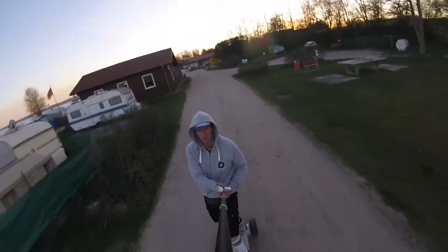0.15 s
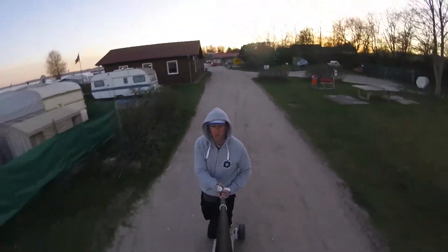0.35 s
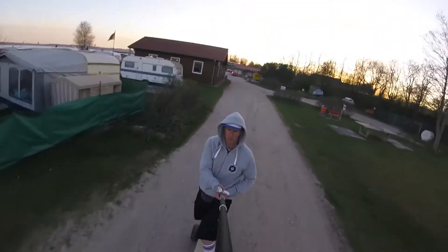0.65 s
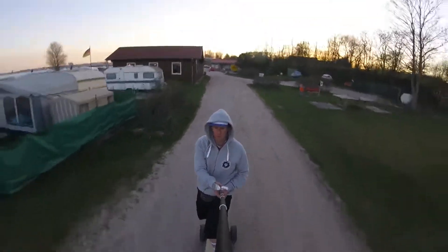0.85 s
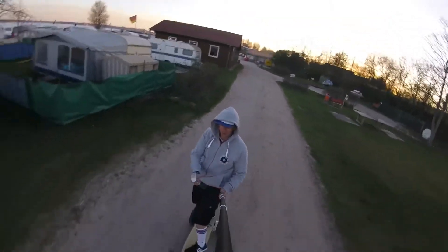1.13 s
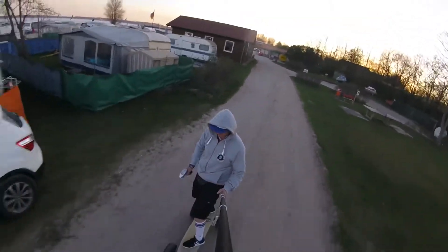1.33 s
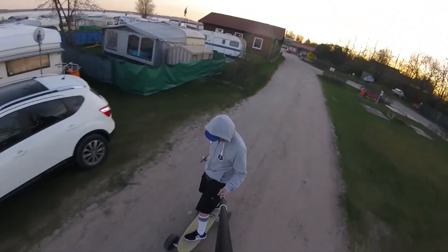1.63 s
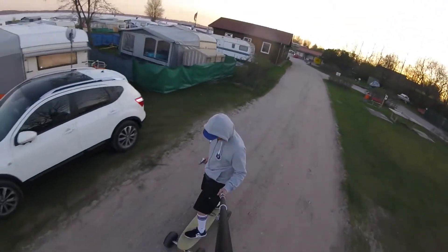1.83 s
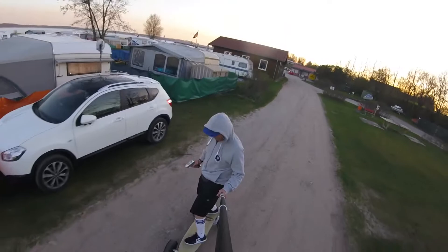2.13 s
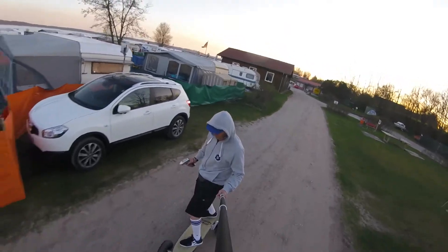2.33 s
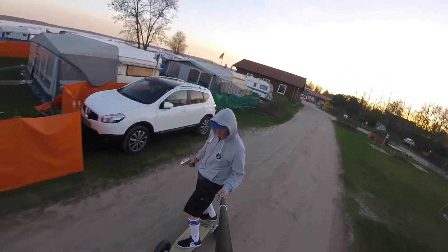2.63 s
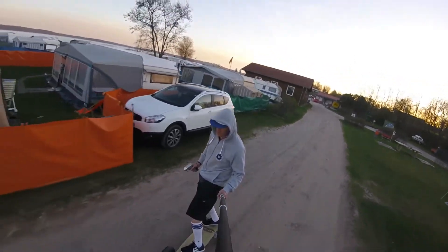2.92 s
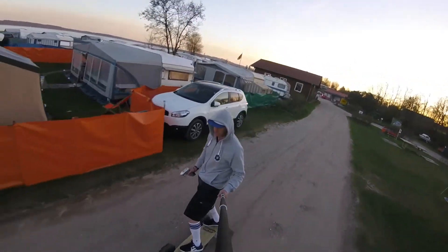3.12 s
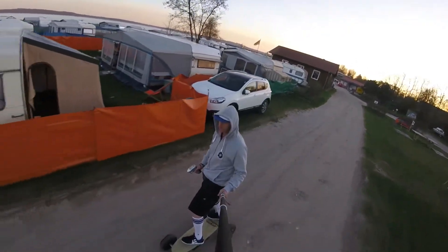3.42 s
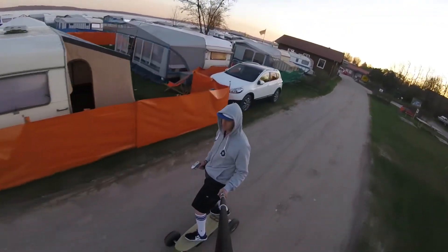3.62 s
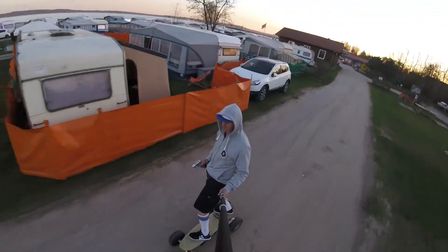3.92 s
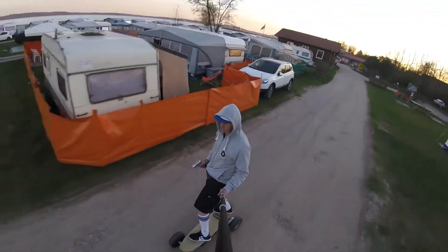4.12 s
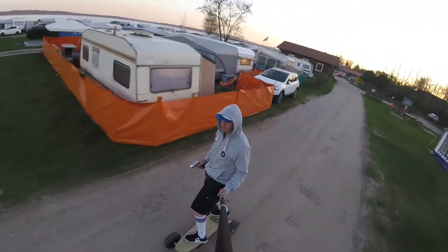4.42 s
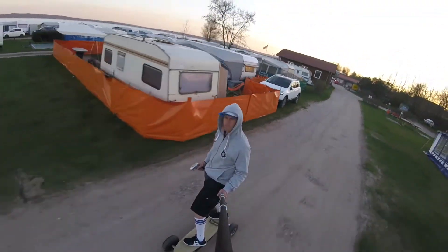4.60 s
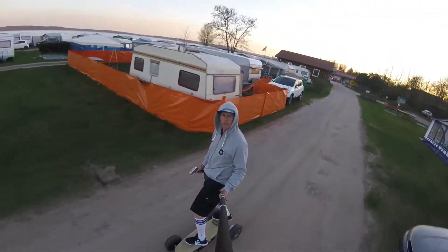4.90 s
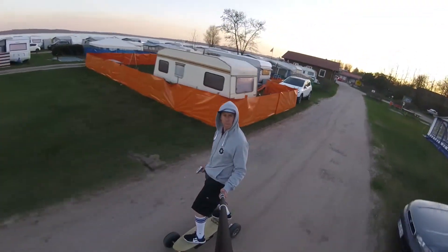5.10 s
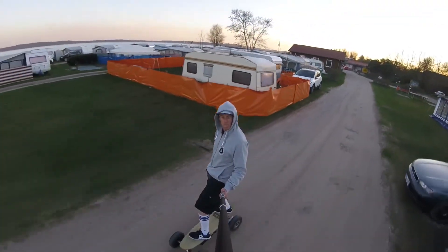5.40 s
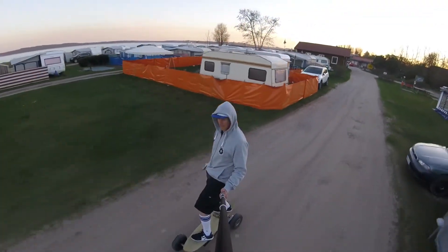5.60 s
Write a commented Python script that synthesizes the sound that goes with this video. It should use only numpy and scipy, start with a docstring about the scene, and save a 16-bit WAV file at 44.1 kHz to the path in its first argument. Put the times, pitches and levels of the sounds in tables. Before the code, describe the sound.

An electric board rolls along a gravel path in the open, heard from a small microphone exposed to moving air. Throughout, the tyres make a dry, grainy crunch with fine fizz, peppered by tiny clicks and sharper stone snaps. From 0 to 2 s, low wind flutters and thumps, with a deep thud near 0.8 s and rough gusts around 1.5 to 1.6 s; a hard snap falls at 1.55 s. Small woody knocks on the board come at 0.4, 0.9 and 1.1 s. Between about 2.3 and 3.8 s the wind mostly eases, exposing crackling stones, with strong snaps near 2.6, 2.9 and 3.15 s. After 2 s a faint motor hum enters and mostly climbs, beneath a thin, high, steady whistle. Wind returns around 4 s; loud snaps hit at 4.3, 4.7, 4.9 and 5.3 s, with buffeting and crunch continuing to the end.

```python
"""Electric board on gravel

An electric mountainboard rolls along a gravel path: filtered noise grains make the tyres' crunch,
and short decaying tones make the snapping stones and the knocks on the board.
Shaped noise and slow pulses make the wind buffeting the microphone.
After about two seconds the rider opens the throttle: sine tones make the controller's whistle
and the motor hum, which mostly climbs."""
import sys
import numpy as np
from scipy import signal
from scipy.fft import rfft, irfft, next_fast_len
from scipy.io import wavfile
from scipy.ndimage import uniform_filter1d

SR = 44100
rng = np.random.default_rng(int(sys.argv[2]) if len(sys.argv) > 2 else 0)


def wav_record(signal):
    """Record a signal, one row per channel, as 16-bit PCM in the file named by sys.argv[1]."""
    frames = np.transpose(np.atleast_2d(signal))
    bounded = np.clip(frames, -1, 1)
    # unit amplitude maps onto the largest positive 16-bit level
    quanta = np.round(bounded * 32767).astype(np.int16)
    wavfile.write(sys.argv[1], SR, quanta)


N = 253575
TIME = np.arange(N) / SR  # seconds

# All table levels are relative: the functions add trims to them.
# Air streaming past the microphone: t/s, buffeting level/dB, flutter level/dB
WIND_CURVE = [(0.0, -26.5, -31.5), (0.5, -20.5, -27.5), (0.95, -22, -31), (1.4, -27.5, -34.5),
              (1.75, -31, -37), (2.05, -24.5, -33), (2.55, -36, -45.5), (2.9, -32.5, -35),
              (3.35, -36, -35.5), (4.0, -23, -31.5), (4.45, -21, -31), (4.62, -23.5, -27),
              (5.35, -25.5, -32), (5.6, -20, -25), (5.75, -19.5, -27.5)]
# Gusts on top of the stream: middle t/s, length t/s, buffeting lift/dB, flutter lift/dB
GUSTS = [(0.337, 0.058, 9, 0), (0.496, 0.084, 3, 8), (0.65, 0.035, 5, -7), (0.73, 0.14, -6, 1),
         (0.917, 0.11, 5.5, 1.5), (1.232, 0.095, 5, -1), (1.337, 0.1, 2.5, 7.5), (1.531, 0.038, 14, 2),
         (1.624, 0.14, 8.5, 11), (1.843, 0.079, 10, 6.5), (1.96, 0.12, 5, 7.5), (2.12, 0.078, 3.5, 5.5),
         (3.456, 0.069, 6, 1), (3.679, 0.13, 6, -1), (3.807, 0.055, 4, 1), (4.177, 0.057, 7, 4),
         (4.372, 0.052, 4, 7.5), (4.444, 0.11, 1.5, 9.5), (4.514, 0.11, 4, 8), (5.001, 0.054, 2.5, 2),
         (5.136, 0.096, 5.5, 1.5), (5.55, 0.067, 0.5, 4), (5.625, 0.061, 1, 4)]
# Lulls in which the air lets go: middle t/s, length t/s, level drop/dB
LULLS = [(.29, 0.039, 3), (.40, 0.13, 4), (.55, .04, 4), (.622, 0.031, 5), (.752, .02, 4), (.845, 0.12, 6),
         (1.01, 0.035, 5), (1.42, 0.048, 9), (1.575, .035, 5), (1.76, 0.2, 1), (3.39, 0.086, 8),
         (4.04, 0.046, 5), (4.23, 0.1, 4), (4.57, 0.15, 5), (5.535, 0.032, 4), (5.597, 0.039, 5),
         (5.675, 0.088, 6)]
# Spectrum of the large eddies: f/Hz, density level/dB
BUFFET_SPECTRUM = [(12, -10), (25, -10), (40, 1.5), (62, 0.5), (100, -3), (140, -16.5), (200, -29.5),
                   (400, -42.5), (1000, -80)]
# Spectrum of the smaller, faster eddies: f/Hz, density level/dB
FLUTTER_SPECTRUM = [(70, -50), (120, 8.5), (160, 2), (220, -2.5), (320, -16), (500, -22.5), (900, -28),
                    (3000, -74)]
# Spectrum of the fine turbulence in strong gusts: f/Hz, density level/dB
TEARING_SPECTRUM = [(120, -12), (230, 3), (330, 3.5), (500, -11.5), (750, -14.5), (1500, -34)]
# Single eddies thudding on the microphone: t/s, peak level/dB, pitch f/Hz
THUDS = [(0.330, -15.5, 110), (0.350, -16, 70), (0.445, -17, 120), (.497, -15.5, 180), (.507, -12, 120),
         (0.576, -12, 83), (0.645, -12, 121), (0.665, -10, 85), (.703, -13.5, 150), (.718, -9.5, 100),
         (0.727, -15, 162), (0.765, -4.5, 58.5), (4.168, -15, 98.8), (4.197, -12, 130), (4.359, -10, 128),
         (4.390, -14.5, 115), (4.452, -14.5, 95), (4.487, -16, 105), (5.511, -10.5, 114), (5.555, -14, 170),
         (5.562, -15.5, 190), (5.621, -7.5, 95.2), (5.634, -9, 90), (5.716, -14, 130)]
# Short ragged buffets: middle t/s, length t/s, level/dB, top of the band f/Hz
TEARS = [(0.325, .025, -28, 378), (0.455, 0.044, -30, 450), (.497, .04, -31, 477), (.642, 0.016, -26, 355),
         (.715, .09, -23, 190), (1.64, 0.045, -31, 238), (4.111, 0.02, -27, 400), (4.164, 0.039, -29, 480),
         (4.289, .025, -35, 486), (4.36, .035, -29, 278), (4.386, 0.023, -42.5, 541),
         (4.438, 0.036, -31, 496), (4.499, 0.0182, -27, 500), (4.525, 0.028, -27, 440),
         (4.695, .025, -34, 477), (4.997, 0.031, -28, 380), (5.556, 0.044, -27, 420),
         (5.616, 0.03, -29.5, 520), (5.71, 0.044, -28, 278)]
# Motor and controller: t/s, hum f/Hz, hum level/dB, whistle level/dB
MOTOR_CURVE = [(1.9, 322, -90, -100), (2.2, 336, -69, -58), (2.5, 337, -66, -62), (3.05, 338.7, -51.5, -59),
               (3.4, 365.3, -49.5, -71), (3.8, 376.8, -47.5, -63), (4.12, 387, -48.5, -66),
               (4.32, 404, -44.5, -69), (4.65, 413, -50, -69), (4.9, 429.7, -50, -64),
               (5.4, 428.3, -46, -57.5), (5.75, 437.5, -53, -63)]
# Partials of the motor hum: multiple of the hum f, level/dB
HUM_PARTIALS = [(1, -3), (2, -15), (3, -10)]
# Stones knocking on the board: t/s, peak level/dB, ring f/Hz, 60 dB decay t/s, rattle level/dB
KNOCKS = [(0.0777, -33, 1023, 0.085, -8), (.4115, -22, 1003, 0.058, -15), (0.412, -28, 1330, 0.035, -11),
          (.4125, -31, 660, 0.031, -10), (0.8638, -29, 1680, 0.016, -5), (0.8728, -25.5, 1670, 0.025, -4),
          (1.134, -23.5, 1130, 0.011, -10), (2.121, -32, 1445, 0.063, 1), (3.159, -36, 994, .015, -4),
          (4.609, -27, 700, 0.037, -12), (5.325, -23, 1499, .018, -14)]
# Loudest stones snapping from under the tyres:
# t/s, peak level/dB, pitch f/Hz, 60 dB decay t/s, contact hardness level/dB
STONES = [(.0773, -19, 1370, 0.0072, -7), (.1543, -13.5, 2030, 0.0055, -5), (.1612, -23, 1920, .004, -7),
          (.1971, -12.5, 2000, 0.0027, -1), (.2029, -17, 2180, .004, 2), (.3499, -17, 2840, .004, -5),
          (.4235, -21, 2050, .012, -10), (.4792, -19, 4800, .0015, -4), (.5543, -24, 3280, .002, -3),
          (.5584, -28, 3030, .002, -6), (.7755, -14.5, 4460, 0.00055, 5.5), (.865, -15, 1750, 0.0075, -10),
          (.9583, -18.5, 1900, .008, 5), (1.0797, -21, 4070, 0.0012, -3), (1.1819, -21, 3580, .002, -4),
          (1.2274, -16, 1700, 0.0065, -4), (1.3179, -20, 2630, .003, -4), (1.3455, -15.5, 4230, 0.0012, -6),
          (1.3868, -17, 2420, .004, 0), (1.455, -19, 4800, .0015, -4), (1.5535, -7, 1820, 0.0036, -9),
          (1.5555, -13, 2540, .003, -6), (2.1202, -21, 1600, .004, -9), (2.1212, -11, 1600, .0045, 2),
          (2.2934, -20, 3500, .002, -2), (2.3949, -17, 2110, 0.0044, -5), (2.4888, -18, 4750, .0015, -3),
          (2.5153, -15.5, 2340, 0.0033, -6), (2.5217, -20, 3900, 0.0017, 0),
          (2.5758, -8.5, 5300, 0.0011, -14), (2.6585, -23, 4280, .0015, -3), (2.7832, -15, 2900, .0055, -3),
          (2.8229, -15, 4430, .0015, -7), (2.8945, -13, 2100, 0.0066, -9), (2.8955, -12, 2070, 0.0089, -5),
          (2.9032, -15, 1560, .004, -5), (2.9725, -16, 5130, 0.002, -4), (3.0298, -20, 2700, .004, -3),
          (3.0359, -16.5, 2430, .003, -4), (3.097, -13, 1550, 0.0029, -11),
          (3.1585, -6.5, 1657, 0.0035, -11), (3.3733, -14, 2245, 0.0041, -1),
          (3.4237, -17, 2430, 0.0077, -9), (3.4245, -11.5, 2940, 0.01, -7), (3.6773, -17, 2030, 0.0046, -3),
          (3.9016, -15, 2480, 0.0036, 0), (4.2855, -7.5, 2650, 0.005, -9),
          (4.2858, -12.5, 5200, 0.011, -16), (4.2862, -10.5, 3600, 0.005, -10),
          (4.4572, -15.5, 2525, 0.0037, -2), (4.5012, -13, 1680, 0.0032, -8), (4.6083, -20, 1400, .004, 3),
          (4.7064, -19, 3000, .0027, 0), (4.7085, -18, 1800, .007, -10), (4.7176, -10, 2050, 0.0042, 3.5),
          (4.7275, -19, 1870, .01, -12), (4.7244, -16, 2800, .003, -6), (4.7343, -18, 1930, .004, -6),
          (4.9105, -7.5, 1946, 0.0016, -9), (4.9888, -13.5, 2130, 0.0037, -4),
          (5.3213, -12, 1990, .005, -3), (5.3243, -10, 1510, .004, -8), (5.3255, -12, 1690, 0.0043, -7),
          (5.3295, -17, 5490, 0.0036, -3), (5.333, -20, 2600, .002, 2), (5.4153, -13.5, 2900, 0.0071, -6),
          (5.4362, -13.5, 2700, .004, 0), (5.5936, -18, 4600, 0.0013, -3)]
# How hard the tyres work the path: t/s, coarse crunch level/dB, fine fizz level/dB
ROLL_CURVE = [(0.0, -34, -35), (0.55, -35, -35.6), (0.72, -36.5, -37), (0.98, -35, -35), (1.55, -35, -36.5),
              (1.73, -38, -37), (2.35, -36.5, -37), (2.92, -33.5, -34.5), (3.25, -35.5, -35.5),
              (4.08, -35.5, -36.5), (4.36, -33, -33), (4.75, -32.5, -33.5), (5.22, -35, -34.5),
              (5.42, -34, -32.5), (5.75, -34, -33.5)]
# Patches of loose gravel: middle t/s, length t/s, crunch lift/dB, fizz lift/dB
PATCHES = [(0.443, .043, 2, 5.5), (0.56, 0.041, 3.5, .5), (0.644, 0.063, 4, 1), (2.185, .05, 4.5, 2.5),
           (2.392, 0.015, 8, 5), (2.485, 0.014, 8, 4), (2.887, 0.087, 4, 6), (3.033, 0.027, 5.5, 3),
           (3.371, 0.075, 6, 9), (3.41, .056, 4.5, 4), (3.698, 0.098, 6.5, 2.5), (3.911, 0.08, 2, 6.5),
           (4.618, 0.0336, 7, 3), (4.706, 0.06, 1, 5.5), (5.069, 0.059, 5, 2.5), (5.324, 0.086, 4.5, 4),
           (5.434, .043, 3, 2.5), (5.7, .052, 3, 1.5)]
# Bare, packed ground: middle t/s, length t/s, level drop/dB
BARE = [(1.67, 0.093, 1), (1.855, 0.036, 2), (2.365, 0.11, 2), (2.43, 0.054, 3.5), (3.085, 0.058, 2),
        (3.29, 0.13, 2), (3.52, .14, 0.5), (3.78, 0.12, 1), (4.575, 0.041, 1.5), (5.135, 0.051, 3)]
# Spectrum of the crunching gravel: f/Hz, density level/dB
GRAVEL_SPECTRUM = [(200, 2), (420, 4), (600, -2), (800, -4.5), (1050, -0.5), (1350, 0), (1800, 3.5),
                   (2400, 1.5), (3000, 1), (4100, -4), (5300, -1), (7300, -4.5), (9400, -7)]
# Resonances of the microphone housing: f/Hz, width f/Hz, lift/dB
HOUSING = [(4930, 600, 4.0), (5466, 680, 5.5), (6280, 600, -4.0), (6476, 570, 10.5)]

SWITCHING_HZ = 7813  # middle of the controller's whistle
TREBLE_EDGE_HZ, ABOVE_EDGE_DB, CUTOFF_HZ = 9684, -24.5, 12700
# Small random stones: the rate is for ordinary ground, and higher ones ring shorter
PEBBLES_PER_S, PEBBLE_OVER_CRUNCH_DB, PEBBLE_SPREAD_DB = 40, 12, 0.1
PEBBLE_HZ, PEBBLE_SPREAD_OCTAVES = 3600, 0.4
PEBBLE_RING_CYCLES, PEBBLE_HARDNESS_DB = 7, -11  # cycles until 60 dB down; contact hardness


def from_db(db):
    """Turn decibels into a gain."""
    return 10 ** (np.asarray(db) / 20)


def rms_one(x):
    """Scale a sound to an rms (average strength) of 1."""
    return x / np.sqrt(np.mean(x ** 2) + 1e-20)


def in_time(rows):
    """Join the points of each column by straight lines over time."""
    s, *columns = np.transpose(rows)
    return [np.interp(TIME, s, column) for column in columns]


def swells(rows):
    """Let each event rise and fall in one smooth hump; return their sum in dB."""
    total_db = 0
    for s, length, db in rows:
        place = np.clip((TIME - s) / length, -.5, .5)
        total_db = total_db + db * np.cos(np.pi * place) ** 2
    return total_db


def colour(x, spectrum):
    """Filter a flat sound to a smooth spectrum, with an rms of 1."""
    hz, db = np.transpose(spectrum)
    size = next_fast_len(N + SR)
    bins = np.arange(size // 2 + 1) * SR / size
    gain = from_db(np.interp(np.log(bins + 1), np.log(hz), db))
    return rms_one(irfft(rfft(x, size) * gain, size)[:N])


def drift(rate_hz):
    """Smooth noise into a slow random wander with an rms of 1."""
    step = 40  # one slow value for every 40 samples
    r = np.exp(-2 * np.pi * rate_hz * step / SR)
    noise = rng.standard_normal(N // step + 2002)
    slow = signal.lfilter([1], [1, -2 * r, r * r], noise)[2000:]  # drop the filter's start-up
    return np.interp(np.arange(N) / step, np.arange(len(slow)), rms_one(slow))


def resonance(x, hz, q, lift_db=None):
    """Pass one band with gain 1 at its centre, or lift that band of an otherwise flat sound."""
    w = 2 * np.pi * hz / SR
    k = np.sin(w) / (2 * q)
    middle = -2 * np.cos(w)
    if lift_db is None:
        return signal.lfilter([k, 0, -k], [1 + k, middle, 1 - k], x + 1e-18)
    g = from_db(lift_db / 2)
    return signal.lfilter([1 + k * g, middle, 1 - k * g], [1 + k / g, middle, 1 - k / g], x)


def add(out, s, sound):
    """Mix a short sound in at time s."""
    at = max(round(s * SR), 0)
    out[at:at + len(sound)] += sound[:max(N - at, 0)]


def eddies(spectrum, lumpy_db, lumps_per_s):
    """Make lumpy turbulence whose average strength is evened out over a tenth of a second."""
    air = colour(rng.standard_normal(N), spectrum)
    air = air * from_db(lumpy_db * drift(lumps_per_s))
    return air / np.sqrt(uniform_filter1d(air ** 2, SR // 10) + 1e-12)


def wind(buffet_trim_db, flutter_trim_db, unsteady_db, tearing_db, tearing_onset_db,
         tearing_steepness):
    """Large eddies buffet the microphone, smaller ones flutter, and strong gusts add finer ones."""
    buffet_db, flutter_db = in_time(WIND_CURVE)
    slack_db = unsteady_db * drift(4.2) - swells(LULLS)
    buffet_db = buffet_db + slack_db + swells([(s, length, db) for s, length, db, _ in GUSTS])
    flutter_db = flutter_db + slack_db + swells([(s, length, db) for s, length, _, db in GUSTS])
    buffet = eddies(BUFFET_SPECTRUM, lumpy_db=-1.4, lumps_per_s=8.5)
    buffet = from_db(buffet_db + buffet_trim_db) * buffet
    flutter = eddies(FLUTTER_SPECTRUM, lumpy_db=2.5, lumps_per_s=33.0)
    flutter = from_db(flutter_db + flutter_trim_db) * flutter
    # below the onset, tearing fades faster than the flutter
    below_onset_db = np.minimum(flutter_db - tearing_onset_db, 0)
    torn_db = flutter_db + tearing_db + tearing_steepness * below_onset_db
    torn = from_db(torn_db) * eddies(TEARING_SPECTRUM, lumpy_db=1.5, lumps_per_s=99)
    return buffet + flutter + torn


def thuds(level_db):
    """An eddy sweeps the microphone port: a dip of suction between two soft pushes."""
    out, t = np.zeros(N), TIME[:SR // 10]
    centre = t.mean()
    for s, db, hz in THUDS:
        u = (np.pi * hz * (t - centre)) ** 2
        add(out, s - centre, from_db(db + level_db) * (2 * u - 1) * np.exp(-u))
    return out


def tears(level_db, bottom_hz):
    """Air tears at the microphone in bursts of fine turbulence that quickly swell and die."""
    out = np.zeros(N)
    for s, length, db, top_hz in TEARS:
        hump = np.hanning(round(length * SR))
        band = signal.butter(3, [bottom_hz, top_hz], "band", fs=SR, output="sos")
        air = signal.sosfilt(band, rng.standard_normal(SR // 5))
        burst = rms_one(air[-len(hump):] * hump)
        add(out, s - length / 2, from_db(db + level_db) * burst)
    return out


def motor(wobble, waver_db, whistle_wobble_hz):
    """The hum follows wheel speed, shaken by bumps; the controller whistles near a fixed pitch."""
    hz, hum_db, whistle_db = in_time(MOTOR_CURVE)
    shaken_hz = hz * (1 + wobble * drift(11.67))
    phase = 2 * np.pi * np.cumsum(shaken_hz) / SR
    hum = sum(from_db(db) * np.sin(round(k) * phase) for k, db in HUM_PARTIALS)
    whistle_hz = SWITCHING_HZ + whistle_wobble_hz * drift(23)
    whistle = np.sin(2 * np.pi * np.cumsum(whistle_hz) / SR)
    hum = from_db(hum_db + waver_db * drift(16.0)) * hum
    return np.sqrt(2) * (hum + from_db(whistle_db) * whistle)


def knocks(level_db, rattle_ratio, rattle_q):
    """Thrown stones make the deck or a truck ring briefly, with a rough woody rattle around it."""
    out, t = np.zeros(N), TIME[:SR // 8]
    for s, db, hz, t60, rattle_db in KNOCKS:
        noise = rng.standard_normal(len(t))
        rattle = from_db(rattle_db) * rms_one(resonance(noise, rattle_ratio * hz, rattle_q))
        ring = np.sin(2 * np.pi * hz * t)
        add(out, s, from_db(db + level_db - 60 * t / t60) * (ring + rattle))
    return out


def looseness(uneven_db, bumps_per_s):
    """Loose patches raise crunch and fizz, bare ground lowers both, and the path is uneven."""
    ground_db = uneven_db * drift(bumps_per_s) - swells(BARE)
    coarse_lift_db = ground_db + swells([(s, length, db) for s, length, db, _ in PATCHES])
    fine_lift_db = ground_db + swells([(s, length, db) for s, length, _, db in PATCHES])
    return coarse_lift_db, fine_lift_db


def pebbles(loose_db):
    """Draw small snaps at random, more and louder on loose ground, with the columns of STONES."""
    crunch_db = in_time(ROLL_CURVE)[0] + loose_db / 2
    at = np.flatnonzero(rng.random(N) < PEBBLES_PER_S * from_db(loose_db) / SR)
    strength, pitch = np.clip(rng.standard_normal((N, 2))[at], -2, 2).T
    hz = PEBBLE_HZ * 2 ** (PEBBLE_SPREAD_OCTAVES * pitch)
    peak_db = crunch_db[at] + PEBBLE_OVER_CRUNCH_DB + PEBBLE_SPREAD_DB * strength
    hardness_db = np.full(len(at), PEBBLE_HARDNESS_DB)
    return list(zip(TIME[at], peak_db, hz, PEBBLE_RING_CYCLES / hz, hardness_db))


def stones(rows, level_db, crack_db, crack_hz, body_db, body_ratio, upper_db, upper_ratio,
           scatter_db, scatter_t60, ping_db, ping_hz, ping_t60):
    """A pinched stone snaps free: three brief tones, scattered grit, and a crack and ping."""
    out, t = np.zeros(N), TIME[:SR // 20]
    click = 1.0 * (t == 0)
    crack = resonance(resonance(click, crack_hz, .5), crack_hz, .5)
    ping = np.sin(2 * np.pi * ping_hz * t) * from_db(-60 * t / ping_t60)
    # the harder the contact, the more of this bright edge
    edge = from_db(crack_db) * crack / crack.max() + from_db(ping_db) * ping
    for s, db, hz, t60, hardness_db in rows:
        phase = 2 * np.pi * hz * t
        body = from_db(body_db) * np.sin(body_ratio * phase)
        upper = from_db(upper_db) * np.sin(upper_ratio * phase)
        ring = (np.sin(phase) - body + upper) * from_db(-60 * t / t60)
        grit = rng.standard_normal(len(t)) * from_db(-60 * t / scatter_t60)
        scatter = from_db(scatter_db) * resonance(grit, hz, .5)
        snap = ring / ring.max() + scatter + from_db(hardness_db) * edge
        add(out, s, from_db(db + level_db) * snap)
    return out


def grains(per_s, spread_db):
    """Draw random contacts, most of them weak and a few strong, with an rms of 1."""
    sizes = from_db(spread_db * np.minimum(rng.exponential(1, N), 4))
    signs = rng.choice([-1, 1], N)
    return rms_one(sizes * signs * (rng.random(N) < per_s / SR))


def crunch(coarse_lift_db, fine_lift_db, per_s, spread_db, q, clump_db, patchy_db,
           coarse_trim_db, fine_trim_db, dust_db):
    """Stones of ten sizes grind in clumps under the tread: each size rings in its own band."""
    coarse_db, fine_db = in_time(ROLL_CURVE)
    clumps, out = drift(58), np.zeros(N)
    for hz in np.geomspace(400, 10000, 10):
        contacts = grains(per_s * np.sqrt(hz / 1000), spread_db)  # higher bands get more contacts
        out += resonance(contacts, hz, max(q, .3)) * from_db(patchy_db * drift(30.0))
    out = rms_one(out) + from_db(dust_db) * rng.standard_normal(N)
    out = colour(out * from_db(clump_db * clumps), GRAVEL_SPECTRUM)
    # big stones sound low and fine grit high; their mix changes along the path
    low_pass = signal.butter(3, 3700, fs=SR, output="sos")
    coarse = signal.sosfiltfilt(low_pass, out)
    fine = rms_one(out - coarse)
    coarse_gain = from_db(coarse_db + coarse_lift_db + coarse_trim_db)
    fine_gain = from_db(fine_db + fine_lift_db + fine_trim_db)
    return coarse_gain * rms_one(coarse) + fine_gain * fine


def scene():
    """Mix wind, drive, board and tyres at one microphone."""
    air = wind(buffet_trim_db=-2.5, flutter_trim_db=-5.0, unsteady_db=1.0, tearing_db=-17.0,
               tearing_onset_db=-19.5, tearing_steepness=0.19)
    buffets = thuds(level_db=-4.0) + tears(level_db=-9.5, bottom_hz=130)
    drive = motor(wobble=0.009, waver_db=1.2, whistle_wobble_hz=4.9)
    board = knocks(level_db=0.5, rattle_ratio=0.71, rattle_q=1.1)
    coarse_lift_db, fine_lift_db = looseness(uneven_db=0.66, bumps_per_s=3.1)
    # decay times (t60) are in seconds
    snaps = stones(list(STONES) + pebbles(coarse_lift_db), level_db=-6.0,
                   crack_db=-2.0, crack_hz=2250, body_db=-22.5, body_ratio=0.68,
                   upper_db=-17.5, upper_ratio=1.5, scatter_db=-17.5, scatter_t60=0.051,
                   ping_db=-8.0, ping_hz=5250, ping_t60=0.0029)
    path = crunch(coarse_lift_db, fine_lift_db, per_s=480, spread_db=3.5, q=2.16, clump_db=1.26,
                  patchy_db=2.0, coarse_trim_db=-4.5, fine_trim_db=-6.0, dust_db=-5.5)
    return (air + buffets + drive + board + snaps + path)[None]


def record(dry):
    """The microphone housing colours the treble; little passes its edge, and the top is cut."""
    for hz, width, db in HOUSING:
        dry = resonance(dry, hz, hz / width, lift_db=db)
    edge = signal.butter(28, TREBLE_EDGE_HZ, fs=SR, output="sos")
    passed = signal.sosfiltfilt(edge, dry)
    dry = passed + from_db(ABOVE_EDGE_DB) * (dry - passed)
    top_cut = signal.ellip(8, .3, 70, CUTOFF_HZ, fs=SR, output="sos")
    return signal.sosfilt(top_cut, dry)


dry = scene()
out = record(dry)
wav_record(out)
```